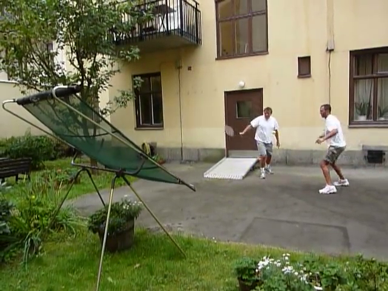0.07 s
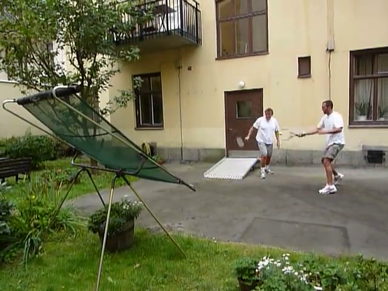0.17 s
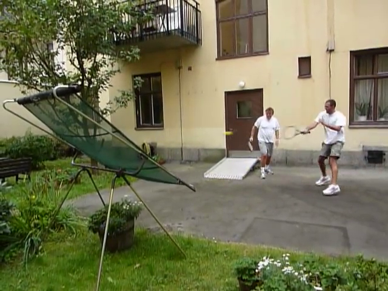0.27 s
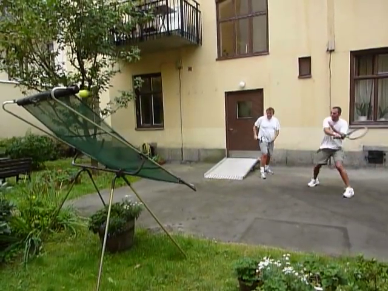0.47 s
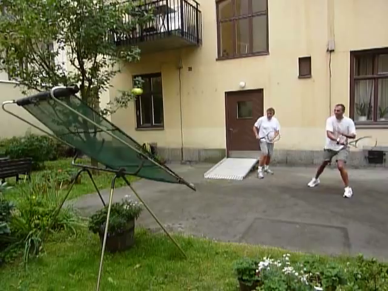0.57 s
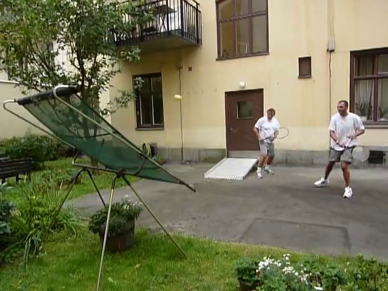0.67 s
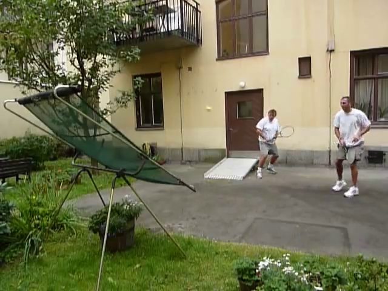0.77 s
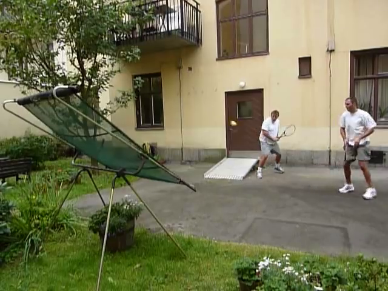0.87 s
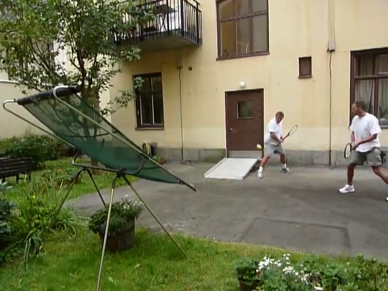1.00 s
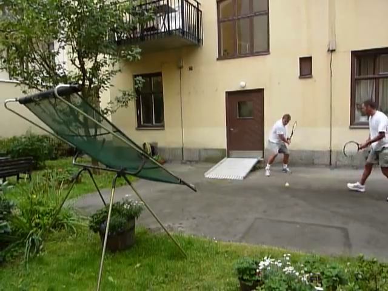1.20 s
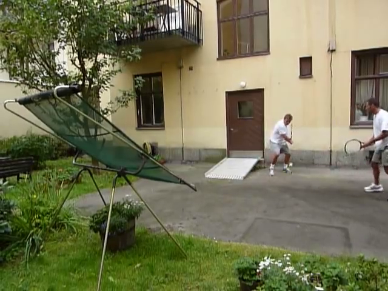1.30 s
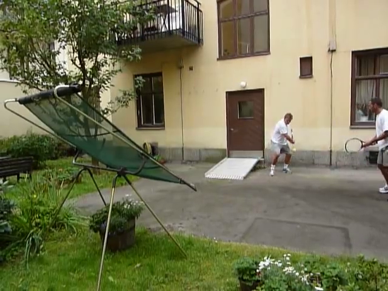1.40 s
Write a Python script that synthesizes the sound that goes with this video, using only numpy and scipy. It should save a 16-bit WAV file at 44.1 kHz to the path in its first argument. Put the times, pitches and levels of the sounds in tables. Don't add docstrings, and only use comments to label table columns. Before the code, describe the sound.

One bright tennis stroke rings off courtyard walls, then soles squeak and scrape as the ball double-knocks a rebound net; more scuffing leads to a quieter bounce on pavement, heard through a dull small microphone.

```python
import sys
import numpy as np
from scipy import signal
from scipy.fft import rfft, irfft
from scipy.io import wavfile
from scipy.ndimage import uniform_filter1d

SR = 44100
rng = np.random.default_rng(int(sys.argv[2]) if len(sys.argv) > 2 else 0)


def amplitude_ratio(level_db):
    exponent = np.asarray(level_db, float) / 20
    return 10 ** exponent


def output_pcm(signal):
    pcm = np.clip(np.atleast_2d(signal).T, -1, 1) * 32767
    wavfile.write(sys.argv[1], SR, np.round(pcm).astype(np.int16))


N = 63945
T = np.arange(N) / SR

# (frequency [Hz], density [dB per Hz])
TOWN_SPECTRUM = [(15, -53), (25, -16), (130, -0.5), (328, -1), (450, -2), (648, -5), (867, -7.5),
                 (933, -4.5), (8300, -23.5), (10800, -67.5), (18300, -120)]
# (frequency [Hz], t60 [s], level [dB])
YARD_DECAY = [(130, 0.94, -21.5), (250, 0.57, -19), (463, 1.6, -21.5), (1000, 1.0, -18.5),
              (2150, .9, -16.5), (3780, 0.38, -15.5), (7560, 0.55, -11)]
# (frequency [Hz], density [dB per Hz])
GRIT_SPECTRUM = [(59, -60), (100, -28.5), (243, -7.5), (590, -9), (1130, -6.5), (1600, -5.5), (2540, -9),
                 (7290, -11.5), (8300, -16.5), (10800, -68.5), (18300, -120)]
# (peak time [s], level [dB], rise [s], fall [s], rubber resonance [Hz])
SCUFFS = [(.0, -38.5, .01, 0.014, 2470), (0.057, -40.5, 0.021, .012, 2650),
          (0.37, -30, 0.017, 0.0086, 2880), (0.406, -39.5, 0.036, 0.029, 3500),
          (0.438, -33, 0.036, 0.036, 2600), (0.53, -39.5, 0.018, 0.013, 3440),
          (0.574, -42.5, 0.023, .02, 3600), (0.645, -41, 0.018, 0.01, 3380),
          (.772, -49.5, 0.015, .012, 7000), (.843, -46.5, 0.012, 0.019, 3630),
          (1.001, -37, .017, .008, 3300), (1.014, -34.5, 0.0071, 0.02, 3180), (1.071, -48, .03, .05, 3400),
          (1.181, -41, 0.021, 0.031, 2560), (1.217, -42.5, 0.016, 0.023, 2550),
          (1.256, -45.5, 0.017, 0.0052, 6500), (1.285, -36, 0.045, 0.018, 2900),
          (1.324, -37.5, 0.028, 0.028, 2660), (1.412, -44, .04, 0.066, 3550)]
# (time [s], level [dB], pitch [Hz], length [s])
SQUEAKS = [
    (.36, -35.5, 2363, 0.023),
    (.523, -34, 3458, .012),
    (.835, -51.5, 3330, 0.012),
    (.993, -40, 2750, 0.012),
    (1.007, -34, 2565, .02),
    (1.008, -42, 3760, 0.014),
    (1.279, -38, 2880, 0.016),
    (1.299, -38, 2565, 0.017),
    (1.317, -33.5, 2450, .013),
]
# (frequency [Hz], level [dB], t60 [s])
ASPHALT_MODES = [(220, -9, .12), (291, -10, 0.089), (727, -12, .025), (1030, 3.5, .05), (1100, -8, .04),
                 (1960, -8, 0.031), (2700, -10, .012), (6500, -8, 0.01)]
# (time [s], level [dB])
BOUNCES = [
    (1.2478, -26.5),
    (1.2595, -34),
]
# (frequency [Hz], level [dB], t60 [s])
NET_MODES = [(135, -30, .1), (320, 1, 0.027), (700, -5, .02), (1200, -2.5, .015), (1730, 1.5, 0.029),
             (3000, -13, .006), (4450, -2, .005), (6500, -0.5, .005)]
# (time [s], level [dB])
NET_HITS = [
    (.4035, -32.5),
    (.409, -32.5),
    (.4672, -29.5),
    (.4715, -28.5),
]
# (time [s], level [dB], pitch [Hz], length [s])
NET_THUMPS = [
    (.356, -36, 240, .025),
    (.402, -42, 60, 0.032),
    (.404, -30.5, 250, 0.01),
    (.4035, -30, 1000, .004),
    (.4672, -24.5, 1438, 0.0072),
    (.4675, -27, 927, 0.0063),
    (.468, -28.5, 543, 0.012),
    (.4705, -24, 197, .009),
]
# (frequency [Hz], width [Hz], level [dB])
POCK_RESONANCES = [(243, 140, -6), (600, 330, -4.5), (929, 240, 5), (1130, 240, 7), (1620, 1000, -7.5),
                   (2750, 670, -6), (3810, 840, -7), (6500, 1400, -14.5)]
# (frequency [Hz], level [dB], t60 [s])
STRING_MODES = [(1610, -10, 0.01), (2800, -9, 0.009), (3720, 1.5, .016), (4810, -6, 0.0041),
                (6230, -8, 0.012)]
# (frequency [Hz], level [dB], t60 [s])
FRAME_MODES = [(242, -15, 0.16), (347, -20.5, 0.022), (475, -3, 0.014), (592, -22.5, 0.61),
               (712, -5.5, 0.032), (800, 1, .02), (912, -5.5, 0.043), (1396, -1.5, 0.033),
               (1580, -3.5, 0.013), (1710, -10, 0.014), (2087, -7, 0.031)]
# (time [s], level [dB], pitch [Hz], length [s])
BALL_RINGS = [
    (.2326, -7.5, 1000, 0.00376),
    (.2362, -8.5, 1156, 0.0094),
    (0.245, -17.5, 1000, 0.011),
    (0.257, -19.5, 1130, 0.012),
]
MIC_DIPS_HZ = (5400, 7710, 8320)

RACKET_S, RACKET_DB, RACKET_CONTACT_S = .2305, -12.5, 0.00059
SNAP_S, SNAP_DB, SNAP_LENGTH_S, FELT_DB = .2287, -18, .003, -22
GRAIN_DB, RUB_WIDTH, RUB_DB, PATCHY_DB = 1.6, 0.8, -5, 0.9
TOWN_DB, YARD_ONSET_S, BALL_LOW_CUT_HZ = -48.5, .014, 146
SCUFF_WET_DB, RING_WET_DB = -1, -11


def level(x, db):
    return x * amplitude_ratio(db) / np.sqrt(np.mean(x ** 2))


def colour(x, points):
    hz, db = np.array(points).T
    f = np.maximum(np.fft.rfftfreq(N, 1 / SR), 1)
    gain_db = np.interp(np.log(f), np.log(hz), db, left=-60, right=-60)
    return irfft(rfft(x) * amplitude_ratio(gain_db), N)


def band(x, hz, width_hz):
    return signal.lfilter(*signal.iirpeak(hz, hz / width_hz, SR), x)


def double_band(x, hz, width_hz):
    return band(band(x, hz, width_hz), hz, width_hz)


def walk(rate_hz):
    k = int(SR / rate_hz)
    return level(uniform_filter1d(uniform_filter1d(rng.standard_normal(N), k), k), 0)


def strike(hits, modes, contact_s=0.00017):
    out = 0
    for at, db in hits:
        t = np.maximum(T - at, 0)
        swell = 1 - np.exp(-t / contact_s)
        for hz, mode_db, t60 in modes:
            balance, detune = rng.standard_normal(2)
            decay = amplitude_ratio(db + mode_db + 1.5 * balance - 60 * t / t60)
            out = out + decay * swell * np.sin(2 * np.pi * hz * (1 + .004 * detune) * t)
    return out


def bursts(rows):
    out = 0
    for at, db, hz, length in rows:
        u = np.clip((T - at) / length, 0, 1)
        swell = np.sqrt(np.abs(np.sin(np.pi * u ** 0.49))) * (u < 1)
        out = out + amplitude_ratio(db) * swell * np.sin(2 * np.pi * hz * (T - at))
    return out


def town():
    swell_db = 1.0 * walk(1) + 0.27 * walk(20)
    return level(colour(rng.standard_normal(N), TOWN_SPECTRUM) * amplitude_ratio(swell_db), TOWN_DB)


def yard(x):
    tail = 0
    for hz, t60, db in YARD_DECAY:
        echoes = level(double_band(rng.standard_normal(N), hz, hz), db)
        tail = tail + echoes * amplitude_ratio(-60 * T / t60) / np.sqrt(t60 * SR / 14)
    tail = tail * (1 - np.exp(-(T / YARD_ONSET_S) ** 2))
    return signal.fftconvolve(x, tail)[:N]


def scuffs():
    clicks = rng.standard_normal(N) * amplitude_ratio(GRAIN_DB * rng.exponential(size=N))
    grit = level(colour(clicks, GRIT_SPECTRUM), 0)
    out = 0
    for at, db, rise, fall, hz in SCUFFS:
        push = np.where(T < at, np.exp(-((T - at) / rise) ** 2), np.exp(-np.abs(T - at) / fall))
        rub = level(double_band(clicks, hz, hz * RUB_WIDTH), RUB_DB)
        out = out + amplitude_ratio(db - 1.0) * push * (grit + rub)
    return out * amplitude_ratio(PATCHY_DB * walk(160))


def squeaks():
    return bursts(SQUEAKS) * amplitude_ratio(3.3 * walk(400))


def bounce():
    return strike(BOUNCES, ASPHALT_MODES)


def net():
    return strike(NET_HITS, NET_MODES)


def pock():
    click = 1. * (np.arange(N) == int(RACKET_S * SR))
    return sum(level(double_band(click, hz, width), db - 40.5) for hz, width, db in POCK_RESONANCES)


def strings():
    times = SNAP_S + SNAP_LENGTH_S * np.linspace(0, 1, num=5)
    snap = strike([(s, SNAP_DB) for s in times], STRING_MODES)
    t = T - SNAP_S
    felt = rng.standard_normal(N) * (t > 0) * np.exp(-np.abs(t) / SNAP_LENGTH_S)
    return snap + amplitude_ratio(FELT_DB) * band(felt, 4500, 6000)


def racket():
    frame = strike([(RACKET_S, RACKET_DB)], FRAME_MODES, RACKET_CONTACT_S)
    return bursts(BALL_RINGS) + frame + strings()


def scene():
    low_cut = signal.butter(N=3, Wn=BALL_LOW_CUT_HZ, btype="high", fs=SR, output="sos")
    hits = signal.sosfilt(low_cut, bounce() + net())
    feet = scuffs()
    rings = bursts(NET_THUMPS) + squeaks()
    wet = yard(pock() + hits + amplitude_ratio(SCUFF_WET_DB) * feet + amplitude_ratio(RING_WET_DB) * rings)
    direct = signal.sosfilt(low_cut, racket()) + hits + feet + rings
    return (direct + wet + town())[None]


def low_pass(x):
    return signal.sosfilt(signal.butter(12, 8740, fs=SR, output="sos"), x)


def record(dry):
    mix = signal.sosfilt(signal.ellip(8, 1, 60, 8060, fs=SR, output="sos"), dry)
    for hz in MIC_DIPS_HZ:
        mix = signal.lfilter(*signal.iirnotch(hz, 20, SR), mix)
    return low_pass(mix)


dry = scene()
out = record(dry)
output_pcm(out)
```